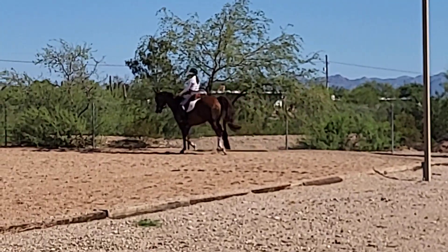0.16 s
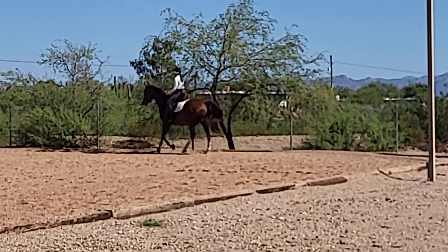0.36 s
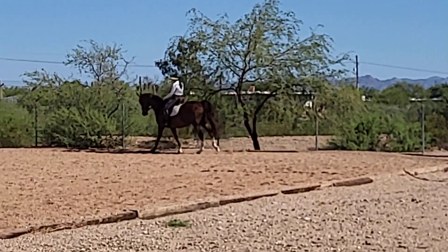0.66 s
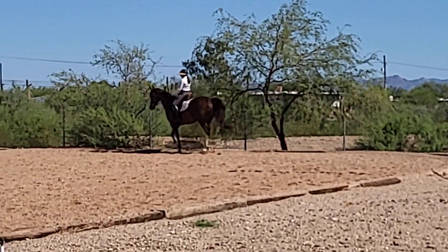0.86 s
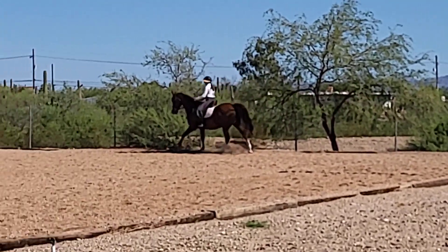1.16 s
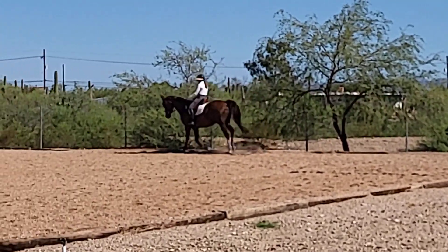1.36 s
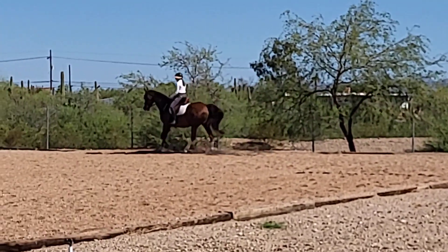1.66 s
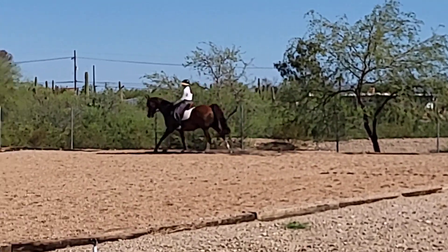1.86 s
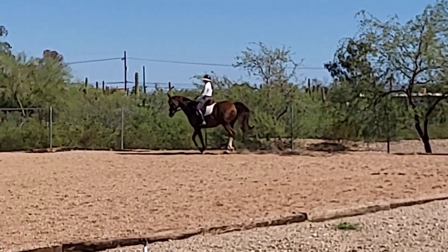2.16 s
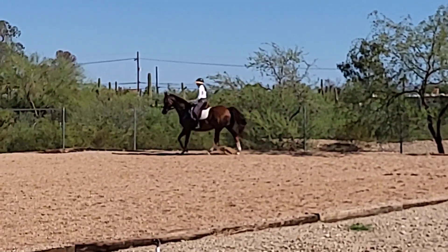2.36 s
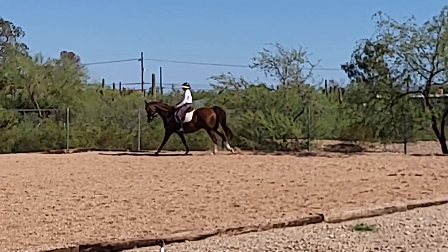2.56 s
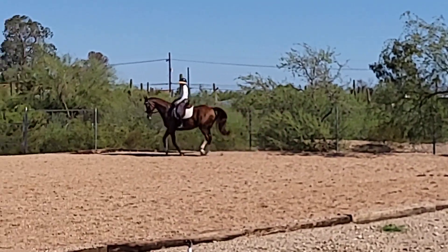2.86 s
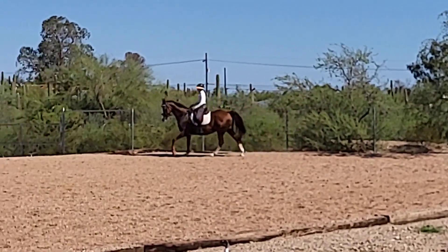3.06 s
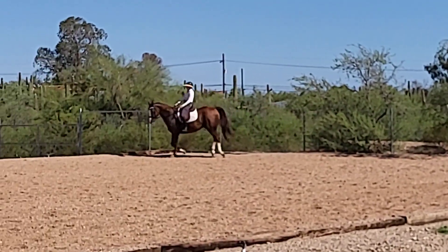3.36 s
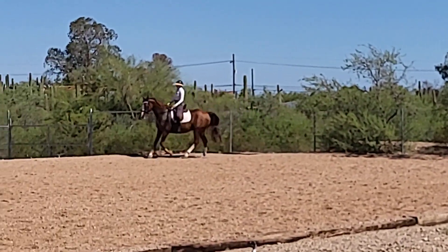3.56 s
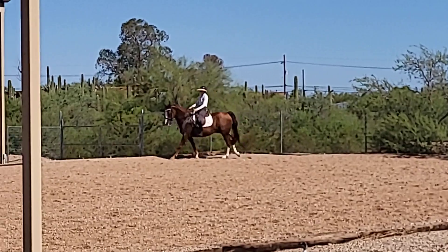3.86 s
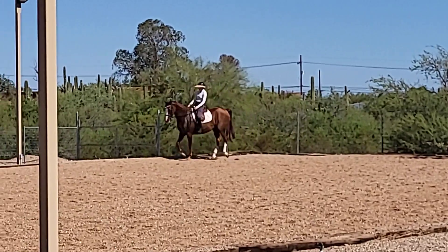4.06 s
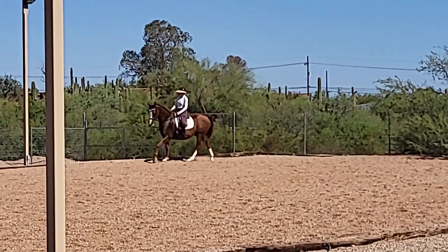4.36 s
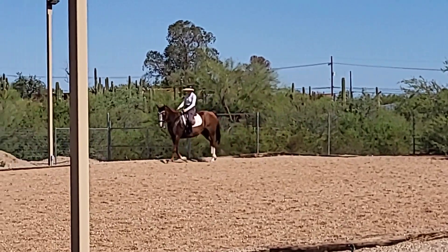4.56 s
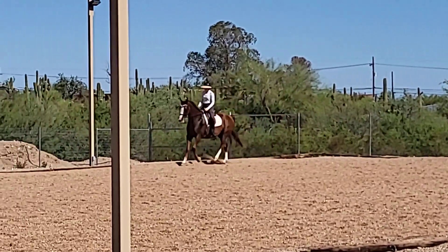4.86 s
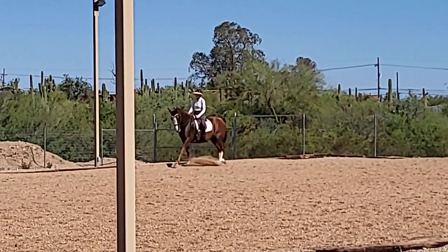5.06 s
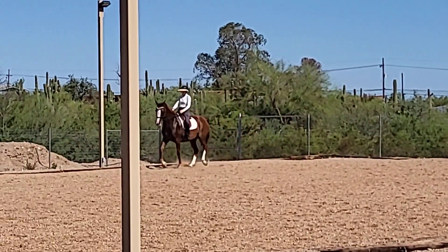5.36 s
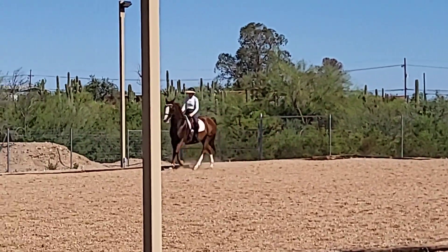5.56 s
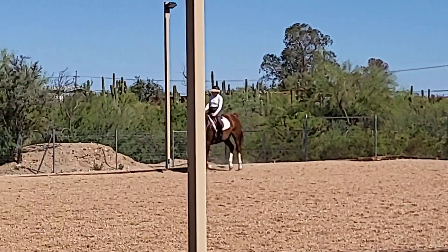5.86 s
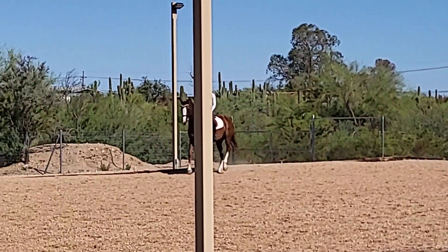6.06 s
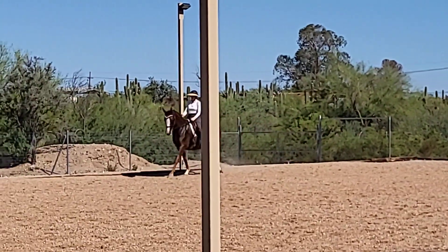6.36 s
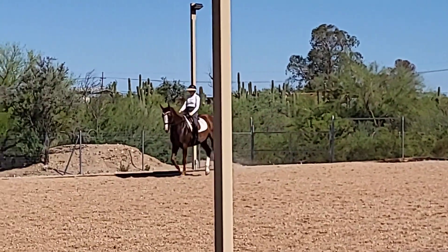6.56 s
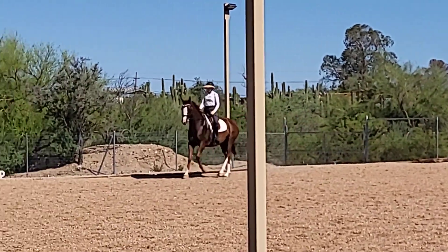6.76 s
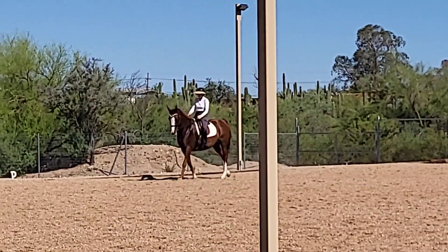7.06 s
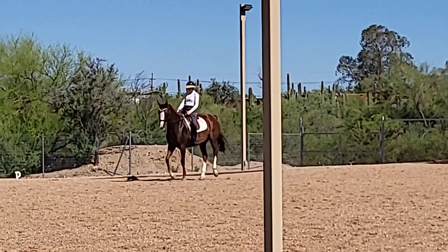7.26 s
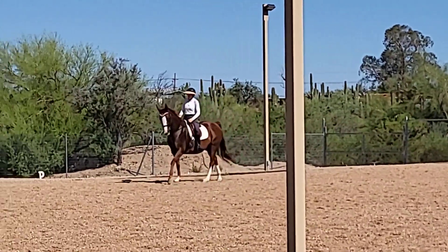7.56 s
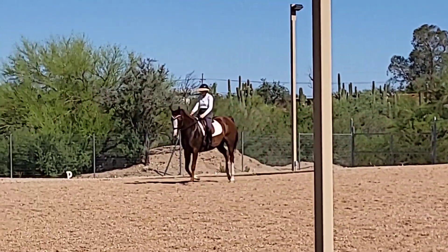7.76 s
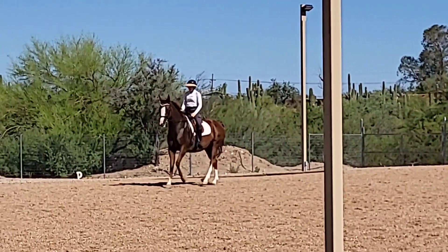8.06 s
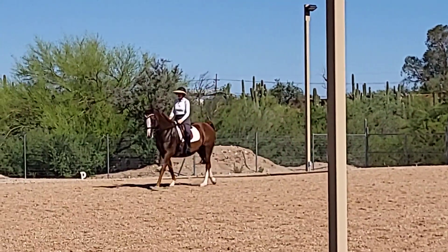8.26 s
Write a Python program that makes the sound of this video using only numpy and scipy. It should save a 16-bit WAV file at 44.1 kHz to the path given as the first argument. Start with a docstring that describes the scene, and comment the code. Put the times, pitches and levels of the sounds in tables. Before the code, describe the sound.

Phone microphone outdoors beside a sandy arena. Deep soft traffic rumble and a wavering machine hum continue throughout, with a far engine swelling in the first two seconds, then sinking. Above it, insects dominate the treble: throbbing hiss, clusters of far rasps, and sharp near clicks rushing into short dry buzzes. The trotting horse is barely audible, with irregular tiny stone knocks and whispers of thrown sand. A faint, almost inaudibly high whistle comes and goes.

```python
"""Grasshoppers and a distant trotting horse

A horse trots far off across a dry sand arena; its hooves only tick on stones, drag and throw a little sand,
made from short rings and clumps of noise grains. Grasshoppers rasp in the scrub, one close by and others
further off: trains of tiny clicks, over a grainy hiss for the many far insects. A thin whistle comes and goes.
Shaped noise makes the rumble of a distant road, and sine waves make a hum and a six-cylinder engine that
revs up and coasts down."""
import sys
import numpy as np
from scipy import signal
from scipy.fft import rfft, irfft, next_fast_len
from scipy.io import wavfile
from scipy.ndimage import uniform_filter1d

SR = 44100
rng = np.random.default_rng(int(sys.argv[2]) if len(sys.argv) > 2 else 0)


def output_pcm(signal):
    """Save a mono or channel-first signal as 16-bit PCM at the path in sys.argv[1].

    Samples are clipped to [-1, 1] before scaling.
    """
    pcm = np.clip(np.atleast_2d(signal).T, -1, 1) * 32767
    wavfile.write(sys.argv[1], SR, np.round(pcm).astype(np.int16))


def volts_from_db(level):
    """Convert decibel levels to linear amplitude ratios."""
    exponent = np.asarray(level, float) / 20
    return 10 ** exponent


N = 370881
T = np.arange(N) / SR  # time of every sample in seconds

# Engine. Each row: time in seconds, firing rate in Hz, level of the firing tone in dB,
# level of the upper partials in dB; rate and levels waver around these.
ENGINE = [(0, 66.8, -46.5, -91), (.3, 65.4, -74, -64), (.9, 79.24, -49.5, -66.5), (1.15, 79.03, -52, -58.5),
          (2.1, 70.68, -55, -57), (3.0, 63.6, -63.5, -64.5), (3.6, 58.38, -55.5, -77.5),
          (4.6, 57.9, -53.5, -82), (5.0, 54.95, -57, -80)]
# Upper engine partials, heard because the cylinders are uneven.
# Each entry: pitch in thirds of the firing rate, level in dB relative to the upper partials.
UPPER_PARTIALS = {4: -3, 5: -4, 6: -4.5}
# Hum of far machinery, which swells and then fades. Each row: time in seconds, level in dB before it wavers.
HUM = [(0, -58.5), (1, -47), (2, -54), (3.4, -55.5), (4.6, -53), (6.5, -59), (8.41, -74)]
HUM_HZ = 87.76  # the pitch wavers around this
# Colour of road rumble and open air. Each row: frequency in Hz, relative level in dB per Hz.
AIR_COLOUR = [(12, -53), (20, -17.5), (54, 0.5), (86, -1.5), (116, -7), (260, -26.5), (385, -35),
              (557, -39), (622, -39.5), (643, -31.5), (659, -41.5), (676, -34.5), (705, -37), (926, -45.5),
              (2180, -50.5), (3500, -50), (4300, -54), (5000, -52), (6500, -56), (11000, -120)]
# Road. Each row: time in seconds, then levels in dB before the gusts of
# deep rumble (below 300 Hz), tyre roar (300-1000 Hz), open air (above 1000 Hz).
ROAD = [(0, -45, -75.5, -82), (.9, -49, -76.5, -83.5), (1.6, -48, -76.5, -83), (2.5, -48, -78, -83),
        (3.4, -49, -79, -82.5), (5, -50, -79, -83), (7.2, -50, -78.5, -82.5), (8.41, -49.5, -79, -82.5)]

# Blurred insect chorus in the scrub. Each row: time in seconds,
# level below SPLIT_HZ in dB, level above SPLIT_HZ in dB, both before they throb.
CHORUS = [(0, -80, -78), (.45, -75, -82), (1.0, -74, -69.5), (1.4, -77.5, -80), (1.9, -76, -79.5),
          (2.55, -75, -75), (2.9, -77.5, -79), (3.4, -76, -80), (3.75, -76, -78), (4.65, -77, -74),
          (5.1, -76, -84), (5.65, -72.5, -73), (6.05, -81, -81), (6.45, -75.5, -73), (6.8, -81.5, -80),
          (7.15, -79, -84), (7.85, -74, -72), (8.41, -83, -83)]
# Colour of the chorus. Each row: frequency in Hz, relative level in dB per Hz.
CHORUS_COLOUR = [(2650, -24), (4500, -20.5), (5860, -7.5), (6330, -6.5), (6990, -4.5), (7600, 0.5),
                 (8030, -5), (8640, -10), (9880, -11.5), (11200, -26.5)]
# Colour of the airy top. Each row: frequency in Hz, relative level in dB per Hz.
HISS_COLOUR = [(8000, -9), (10500, -8), (11500, -8), (12800, -4), (14000, -2), (15200, 0), (15900, 0)]
HISS_DB = -82  # level of the steady airy hiss

# A thin high whistle that comes and goes.
# Each row: start in seconds, length in seconds, level in dB before it wavers.
WHISTLE = [(0.03, 0.065, -75), (0.406, 0.37, -68), (0.803, 0.38, -72), (1.599, 0.2, -81),
           (1.948, 0.46, -79), (2.374, 0.18, -75), (2.73, 0.63, -75), (3.326, 0.21, -74), (3.63, 0.55, -76),
           (4.111, 0.12, -69), (4.376, 0.65, -69.5), (5.139, 0.19, -67), (5.418, 0.61, -68.5),
           (6.374, .59, -66.5), (6.99, 0.2, -71), (7.228, 0.71, -66), (8.003, 0.24, -65), (8.356, .05, -72)]
WHISTLE_HZ = 15625
FLUTTER, CLEAN_S = 0.95, 0.22  # depth of the chop (0-1), reached this many seconds after each start

WING_HZ, SPLIT_HZ = 8600, 11380  # edges between the three bands of a rasp
# Rasps of the further grasshoppers, many about 75 ms apart. Each row: start in seconds,
# level below WING_HZ in dB, between WING_HZ and SPLIT_HZ in dB, above SPLIT_HZ in dB.
FAR = [(0.104, -65, -87, -94), (0.18, -89, -97, -95), (0.533, -67, -80, -76), (0.616, -72, -93, -79),
       (0.748, -59, -73, -71), (0.819, -64, -68, -68), (0.889, -66, -69, -75), (0.919, -67, -65, -69),
       (0.969, -65.5, -77, -67), (0.998, -72, -69, -66), (1.04, -75, -92, -88), (1.078, -66, -67.5, -64),
       (1.155, -69.5, -87, -93), (1.654, -64, -95, -95), (1.954, -64, -96, -82), (2.03, -61.5, -72, -69),
       (2.102, -66, -65.5, -75), (2.189, -82, -86, -91), (2.225, -80, -82, -85), (2.265, -82, -82, -80),
       (2.363, -69, -88, -80), (2.428, -65, -68, -74), (2.494, -64.5, -70.5, -69), (2.656, -61, -61, -73),
       (2.84, -71, -98, -92), (2.87, -73, -86, -89), (2.915, -76, -88, -87), (3.004, -78, -95, -84),
       (3.074, -62.5, -67, -73), (3.099, -83, -94, -76), (3.123, -71, -88, -75), (3.145, -72, -67.5, -71),
       (3.3, -74, -91, -90), (3.429, -68, -92, -74), (3.475, -73, -92, -82), (3.642, -69, -99, -89),
       (3.682, -82, -96, -84), (4.006, -56, -67, -74), (4.046, -73, -86, -82), (4.084, -66.5, -70, -76),
       (4.169, -69, -68.5, -76), (4.256, -84, -90, -82), (4.308, -66, -86, -72), (4.367, -67.5, -76, -65),
       (4.442, -66.5, -68, -73), (4.465, -73, -91, -75), (4.516, -66, -75, -66), (4.545, -75, -92, -82),
       (4.595, -67, -83, -70.5), (4.625, -74, -93, -84), (4.661, -83, -92, -75), (4.687, -68, -84, -65),
       (4.728, -82, -82, -76), (4.782, -72.5, -79, -70.5), (4.861, -66.5, -73, -75), (5.115, -73, -90, -80),
       (5.168, -69, -88, -90), (5.242, -81, -86, -86), (5.293, -65.5, -72, -76), (5.369, -62.5, -72, -73),
       (5.453, -68, -66, -79), (5.562, -64, -76, -76), (5.608, -69, -89, -71), (5.733, -70, -74, -77),
       (5.814, -75, -84, -92), (5.844, -74, -89, -94), (6.329, -61.5, -70, -62), (6.401, -67, -75, -65),
       (6.476, -63, -78, -66), (6.515, -70, -80, -81), (6.555, -65.5, -67, -82), (6.629, -63.5, -73, -70),
       (6.895, -63.5, -95, -99), (6.96, -65, -93, -93), (7.032, -64.5, -97, -85), (7.404, -65.5, -72, -69),
       (7.475, -65.5, -73, -65), (7.548, -63.5, -71, -70), (7.621, -67.5, -65, -69), (7.661, -76, -93, -81),
       (7.702, -65.5, -80, -64), (7.735, -72.5, -101, -79), (7.777, -72, -90, -84), (7.815, -74, -97, -91),
       (7.876, -69, -73, -74), (8.234, -71.5, -97, -83)]
# Colour of a far rasp. Each row: frequency in Hz, relative level in dB per Hz.
FAR_COLOUR = [(3000, -50), (4700, -29), (5700, -18), (6700, -9), (7600, 0), (8100, -2), (9000, -9),
              (10300, -5), (10750, -5), (11200, -15), (12100, -15), (12800, -11), (14000, -7), (15100, -5),
              (15800, -5), (16000, -40)]
FAR_SWELL_S, FAR_HOLD_S = 0.011, 0.0066

# Dense rasps of the near grasshopper. Each row: start in seconds, length before the tail in seconds,
# level below WING_HZ in dB, between WING_HZ and SPLIT_HZ in dB, above SPLIT_HZ in dB.
NEAR = [(0.3065, 0.013, -61.5, -68, -49.5), (0.392, 0.0072, -62.5, -61, -49),
        (1.417, 0.012, -60, -71, -49.5), (1.507, 0.0086, -61, -66, -49), (2.599, 0.011, -65, -61, -53),
        (2.696, 0.0076, -60, -64, -48), (3.73, 0.016, -62, -66, -54.5), (3.8296, 0.013, -62.5, -67, -55),
        (4.952, 0.018, -64.5, -65, -53), (5.692, 0.011, -61, -68, -50.5), (6.163, 0.02, -64.5, -69, -54),
        (6.262, 0.012, -60, -64, -51), (7.12, 0.017, -63, -66, -55.5), (7.207, 0.011, -63.5, -69, -50.5),
        (7.938, 0.013, -63, -65, -53), (8.021, 0.011, -64, -66, -52)]
# Colour of a near rasp. Each row: frequency in Hz, relative level in dB per Hz.
NEAR_COLOUR = [(2500, -60), (3600, -36), (4200, -33), (4900, -19), (5600, -17), (6700, -16), (7450, -5),
               (8000, -9), (8800, -17), (9700, -7), (10500, -10), (11500, -17), (12300, -10), (13200, 0),
               (14200, -3), (15200, 0), (15800, -2), (16000, -40)]
NEAR_SWELL_S = 0.003
# Lone snaps that lead into each near rasp. Each row: time in seconds,
# relative click level below WING_HZ in dB, relative click level above WING_HZ in dB.
LEAD_SNAPS = [(0.293, -52, -59), (0.3011, -53, -42), (0.389, -51, -37.5), (1.3986, -53, -72),
              (1.4035, -50, -54), (1.4096, -52, -40), (1.416, -54, -40), (1.5029, -60, -37.5),
              (2.5738, -66, -61), (2.5768, -59, -59), (2.581, -62, -53), (2.5864, -45.5, -54),
              (2.5933, -54, -39), (2.5984, -53, -46), (2.6918, -48.5, -35.5), (3.7183, -48.5, -56),
              (3.725, -52, -48), (3.729, -62, -45), (3.8296, -50, -41), (4.942, -50, -50),
              (4.9493, -52, -44), (5.6802, -62, -54), (5.6861, -55, -46), (5.6914, -54, -41),
              (6.155, -54, -55), (6.1612, -61, -44), (6.2547, -57, -41), (7.1076, -51, -56),
              (7.1144, -53, -44), (7.1206, -51, -41), (7.1984, -68, -46), (7.2053, -59, -40.5),
              (7.9216, -51, -59), (7.9264, -68, -53), (7.9308, -56, -41), (8.0134, -59, -43),
              (8.02, -53, -46)]
GROUND_S, GROUND_DB = 0.0022, -5  # each lone snap comes again off the ground: delay and relative level
RUSTLE_DB, RUSTLE_HZ, RUSTLE_S = -79, 5200, 0.064  # duller rustle that outlasts each near rasp

# A hoof knocks a stone. Each row: time in seconds, level in dB, centre of the ring in Hz.
TICKS = [(0.68, -73, 7000), (0.844, -59.5, 7200), (1.129, -54, 7000), (1.7664, -55.5, 6380),
         (3.078, -57, 7350), (3.3323, -60, 6800), (5.758, -58, 6900), (3.429, -75, 5500),
         (7.969, -54, 6640)]
# Sand thrown by a hoof. Each row: start in seconds, rough length in seconds, level in dB, centre in Hz.
SPRAY = [(.745, 0.082, -78, 5000), (1.2, 0.029, -80.5, 4400), (1.55, 0.035, -78, 5630),
         (1.8, 0.065, -70.5, 6270), (2.61, .09, -77, 5500), (3.15, 0.068, -73, 5600),
         (3.3, 0.081, -73.5, 6000), (3.345, 0.12, -74, 4960), (3.92, 0.059, -72.5, 5490),
         (5.11, 0.082, -71.5, 5730), (5.6, 0.051, -75.5, 5800), (6.49, 0.038, -78, 4850),
         (7.14, 0.046, -67.5, 5850), (7.085, 0.027, -69, 6500), (7.77, 0.044, -74, 5400),
         (8.21, 0.037, -77.5, 6950), (8.33, 0.12, -77.5, 6400)]
# A hoof drags through sand. Each row: start in seconds, rough length in seconds, level in dB.
SCUFFS = [(0.888, 0.037, -83), (2.805, 0.059, -80), (3.44, 0.036, -83.5), (5.326, .045, -88),
          (6.09, 0.045, -75.5), (6.602, .045, -85), (7.252, 0.049, -84), (7.72, 0.049, -81),
          (7.886, 0.045, -80)]
SCUFF_HZ = 2030  # centre of every scuff

TOP_HZ = 15800  # the phone cuts everything above this


def curve(table):
    """Columns of a table, one value a sample."""
    s, *columns = np.transpose(table)
    return [np.interp(T, s, c) for c in columns]


def unit(x):
    """Scale to rms 1."""
    return x / np.sqrt(np.mean(x ** 2))


def colour(x, points, lo_hz=0, hi_hz=SR):
    """Shape x by a spectrum between two soft edges; white noise of rms 1 keeps rms 1."""
    size = next_fast_len(N)
    hz = np.arange(size // 2 + 1) * SR / size + 1  # 1 Hz up, to keep clear of zero
    f, db = np.transpose(points)
    gain = volts_from_db(np.interp(np.log(hz), np.log(f), db))
    gain = gain / np.sqrt((1 + (lo_hz / hz) ** 24) * (1 + (hz / hi_hz) ** 24))
    return irfft(rfft(x, size) * unit(gain), size)[:N]


def fade(x, tau_s):
    """Exponential tail after every impulse, peak kept."""
    return signal.lfilter([1], [1, -np.exp(-1 / (tau_s * SR))], x)


def walk(rate):
    """Random levels held 1 / rate seconds and smoothed twice; spread 1."""
    k = int(SR / rate)
    held = np.repeat(rng.standard_normal(N // k + 1), k)
    smooth = uniform_filter1d(uniform_filter1d(held, k), k)
    return unit(smooth[:N])


def band(x, hz, width):
    """Two-pole band-pass applied twice: a resonance around hz."""
    b, a = signal.iirpeak(hz, hz / width, fs=SR)
    return signal.lfilter(b, a, signal.lfilter(b, a, x))


def stroke(start, swell, hold, tail_s, lead=0):
    """Envelope of one stroke: swells from a weak lead-in, holds, dies away."""
    i = int(start * SR)
    t = np.arange(min(int((swell + hold + 8 * tail_s) * SR), N - i)) / SR
    up = lead + (1 - lead) * np.clip(t / swell, 0, 1) ** 2
    return slice(i, i + len(t)), up * np.exp(-np.maximum(t - swell - hold, 0) / tail_s)


def engine():
    """Each cylinder firing is one turn of a sine; uneven cylinders add partials at thirds of that rate."""
    firing_hz, firing_db, upper_db = curve(ENGINE)
    phase = 2 * np.pi * np.cumsum(firing_hz * (1 + 0.003 * walk(4))) / SR
    upper = sum(volts_from_db(db + 3.5 * walk(8)) * np.sin(k * phase / 3 + k) for k, db in UPPER_PARTIALS.items())
    firing = volts_from_db(firing_db + 2.2 * walk(6)) * np.sin(phase)
    return np.sqrt(2) * (firing + volts_from_db(upper_db) * upper)


def machinery_hum():
    """Far machinery hums on one tone that wavers in pitch and level."""
    level = volts_from_db(curve(HUM)[0] + 1.0 * walk(4.2))
    phase = 2 * np.pi * np.cumsum(HUM_HZ * (1 + 0.0053 * walk(5.08))) / SR
    return np.sqrt(2) * level * np.sin(phase)


def road():
    """Road rumble, tyre roar and open air are three bands of one shaped noise."""
    noise = rng.standard_normal(N) * volts_from_db(1.28 * walk(13))  # gusts move every band together
    rumble_db, roar_db, air_db = curve(ROAD)
    rumble = volts_from_db(rumble_db) * colour(noise, AIR_COLOUR, hi_hz=300)
    roar = volts_from_db(roar_db) * colour(noise, AIR_COLOUR, lo_hz=300, hi_hz=1000)
    air = volts_from_db(air_db + 0.7 * walk(10)) * colour(noise, AIR_COLOUR, lo_hz=1000)
    return rumble + roar + air


def snaps(at, spread_db, snap_s):
    """Leg pegs snapping over a wing vein at the given samples: a sharp click, then a tiny burst of noise."""
    clicks = np.zeros(N)
    size = volts_from_db(spread_db * rng.standard_normal(len(at)))
    clicks[at[at < N]] = size[at < N]
    return 0.72 * clicks + fade(clicks, snap_s) * rng.standard_normal(N)


def chorus():
    """Many far insects merge into a grainy, throbbing hiss; a steady airy hiss lies under the top."""
    low_db, high_db = curve(CHORUS)
    throb = 1.7 * walk(6) + 2.1 * walk(24) + 2.6 * walk(60)  # in dB
    gaps = SR / 280 * np.exp(0.72 * rng.standard_normal(N // 100))  # uneven gaps between snaps
    at = np.cumsum(gaps).astype(int)
    pegs = unit(unit(snaps(at, spread_db=1.5, snap_s=0.0014)) + 1.2 * rng.standard_normal(N))
    low = volts_from_db(low_db + throb) * colour(pegs, CHORUS_COLOUR, hi_hz=SPLIT_HZ)
    high = volts_from_db(high_db + 0.74 * throb) * colour(rng.standard_normal(N), HISS_COLOUR, lo_hz=SPLIT_HZ)
    hiss = volts_from_db(HISS_DB) * colour(rng.standard_normal(N), HISS_COLOUR, lo_hz=8300)
    return low + high + hiss


def whistle():
    """A faint sine near the top of hearing starts steady, then is chopped about twenty times a second."""
    chop = np.abs(np.sin(np.pi * np.cumsum(22 * (1 + 0.2 * walk(15))) / SR)) ** 1.5
    level = np.zeros(N)
    for start, length, db in WHISTLE:
        span, shape = stroke(start, 0.0084, length - 0.02, 0.041)
        flutter = FLUTTER * np.clip((T[span] - start) / CLEAN_S, 0, 1) ** 3
        level[span] += volts_from_db(db) * shape * (1 - flutter * (1 - chop[span]))
    return np.sqrt(2) * level * volts_from_db(1.3 * walk(40)) * np.sin(2 * np.pi * WHISTLE_HZ * T)


def grasshopper(table, spectrum, slow_s, fast_s, blur, leads, tail_s, echo_db, echo_s, spread_db):
    """Each leg stroke drags pegs over the wing, slowly at first, then in a dense run; the scrub echoes softly."""
    levels, run, at = np.zeros((3, N)), np.zeros(N), []
    for (start, swell, hold, *dbs), jitter in zip(table, rng.standard_normal((len(table), 40))):
        for level, db, lead in zip(levels, dbs, leads):
            span, shape = stroke(start, swell, hold, tail_s, lead)
            level[span] += volts_from_db(db) * shape
        t = start + 0.0004
        ramp = 1.5 * swell + 0.003  # the leg takes this many seconds to reach full speed
        for j in jitter:
            at.append(int(t * SR))
            speed = min((t - start) / ramp, 1)  # the leg speeds up, so the pegs crowd together
            t += (slow_s + (fast_s - slow_s) * speed ** 2) * np.exp(0.16 * j)
        run[span] = np.maximum(run[span], np.clip((T[span] - start) / ramp, 0.2, 1))
    pegs = snaps(np.array(at), spread_db=spread_db, snap_s=0.00065) + blur * run * rng.standard_normal(N)
    pegs = pegs / np.sqrt(np.average(pegs ** 2, weights=levels[-1] ** 2))  # rms 1 during the rasps
    scatter = rng.standard_normal(N) * volts_from_db(echo_db)
    edges = (0, WING_HZ, SPLIT_HZ, SR)
    out = np.zeros(N)
    for level, lo_hz, hi_hz in zip(levels, edges, edges[1:]):
        echo = scatter * np.sqrt(fade(level ** 2, echo_s) / (echo_s * SR))
        out += colour(level * pegs + echo, spectrum, lo_hz, hi_hz)
    return out


def far_grasshoppers():
    """Far legs rasp with wider gaps between pegs; all rasps share one quick swell and hold."""
    rasps = [(s, FAR_SWELL_S, FAR_HOLD_S, *dbs) for s, *dbs in FAR]
    return grasshopper(rasps, FAR_COLOUR, slow_s=0.0045, fast_s=0.0036, blur=0.22, leads=(0.7, 0.4, 0.35),
                       tail_s=0.0079, echo_db=-16, echo_s=0.016, spread_db=1.7)


def lead_snaps():
    """Single pegs: a dry click with a wisp of noise, rung through the wing's colour."""
    s, *dbs = np.transpose(LEAD_SNAPS)
    one, out = np.eye(1, N)[0], 0
    for db, lo_hz, hi_hz in zip(dbs, (0, WING_HZ), (WING_HZ, SR)):
        clicks = np.zeros(N)
        clicks[(s * SR).astype(int)] = volts_from_db(db)
        clicks = clicks + volts_from_db(GROUND_DB) * np.roll(clicks, int(GROUND_S * SR))
        wisp = 0.3 * fade(clicks, 0.001) * rng.standard_normal(N)
        peak = colour(one, NEAR_COLOUR, lo_hz, hi_hz)[0]  # height of one coloured click
        out = out + colour(0.55 * clicks + wisp, NEAR_COLOUR, lo_hz, hi_hz) / peak
    return out


def patches(table, share, swell_s, lead):
    """Clumps of grains in short patches; each grain size rings briefly at its own pitch.

    Each row of table: start in seconds, rough length in seconds, level in dB, centre in Hz."""
    out = np.zeros(N)
    grains = unit(rng.standard_normal(N) * volts_from_db(5.5 * rng.standard_normal(N) + 2.6 * walk(400)))
    sizes = np.linspace(-1, 1, 7)
    chances = rng.uniform(-1, 1, (len(table), 3, len(sizes)))
    for (start, length, db, hz), (detune, lift, shift) in zip(table, chances):
        span, shape = stroke(start, swell_s, 0.49 * length, 0.36 * length, lead)
        pitches = hz * np.exp(share * (sizes + 0.096 * detune))
        rings = 0
        for size, pitch, u, w in zip(sizes, pitches, lift, shift):
            moved = np.roll(grains, int((shift[0] + 0.05 * w) * SR))[span]  # other grains for each size
            rings = rings + volts_from_db(2.0 * u - 7.0 * size ** 2) * band(moved, pitch, 0.28 * pitch)
        out[span] += volts_from_db(db) * shape * unit(rings)
    return out


def near_grasshopper():
    """Lone peg snaps, then a dense dry rasp; a duller rustle trails each."""
    rasps = [(s, NEAR_SWELL_S, max(length - NEAR_SWELL_S, 0), *dbs) for s, length, *dbs in NEAR]
    rustles = [(s, RUSTLE_S, RUSTLE_DB, RUSTLE_HZ) for s, *_ in NEAR]
    rustle = patches(rustles, share=0.15, swell_s=0.0038, lead=0.78)
    rasp = grasshopper(rasps, NEAR_COLOUR, slow_s=0.0018, fast_s=0.00092, blur=0.45, leads=(0.6, 0.6, 0.5),
                       tail_s=0.0047, echo_db=-17, echo_s=0.02, spread_db=1.5)
    return lead_snaps() + rustle + rasp


def hooves():
    """Stone ticks are short wide rings; spray and scuffs are patches of sand grains."""
    ticks = np.zeros(N)
    for s, db, hz in TICKS:
        span, shape = stroke(s, 0.00014, 0.0017, 0.0041)
        ring = unit(band(rng.standard_normal(2000), hz, 0.48 * hz))
        ticks[span] += volts_from_db(db) * shape * ring[:len(shape)]
    spray = patches(SPRAY, share=0.32, swell_s=0.016, lead=0.44)
    scuffs = patches([(*row, SCUFF_HZ) for row in SCUFFS], share=0.75, swell_s=0.03, lead=0.15)
    return ticks + spray + scuffs


def scene():
    """Road, insects and hooves add up in open air."""
    distance = engine() + machinery_hum() + road()
    insects = chorus() + far_grasshoppers() + near_grasshopper()
    return (distance + insects + whistle() + hooves())[None]


def low_pass(x):
    """Removes everything above the highest recorded frequency."""
    return signal.sosfilt(signal.butter(12, 16650, fs=SR, output="sos"), x)


def record(dry):
    """The phone rolls off the deepest bass and cuts the top steeply."""
    cut = signal.sosfilt(signal.ellip(10, 0.2, 60, TOP_HZ, fs=SR, output="sos"), dry)
    mix = signal.sosfilt(signal.butter(2, 30, "high", fs=SR, output="sos"), cut)
    return low_pass(mix)


dry = scene()
out = record(dry)
output_pcm(out)
```